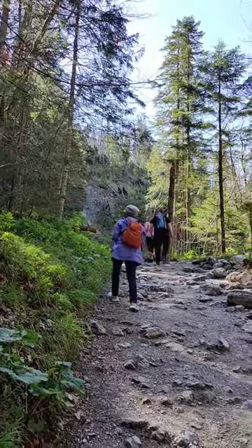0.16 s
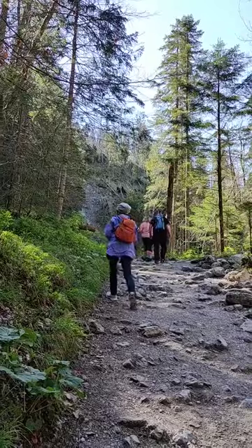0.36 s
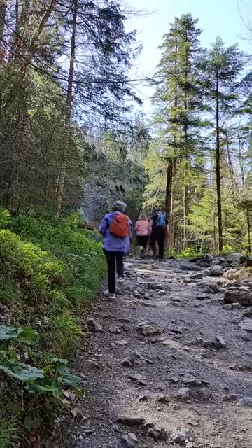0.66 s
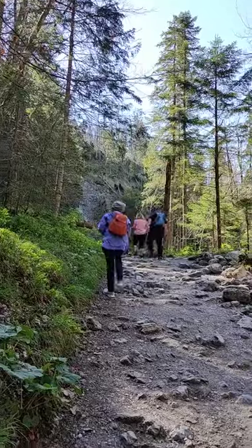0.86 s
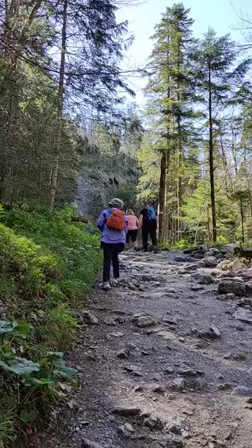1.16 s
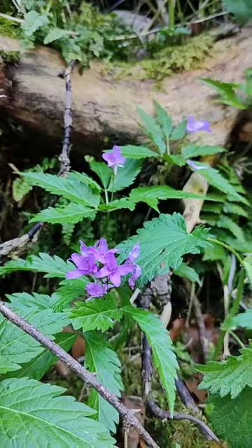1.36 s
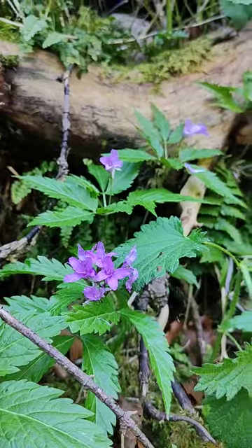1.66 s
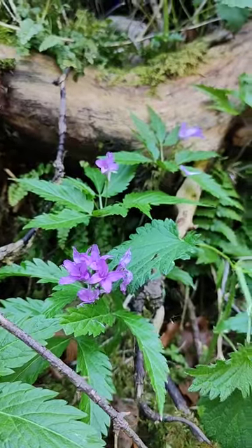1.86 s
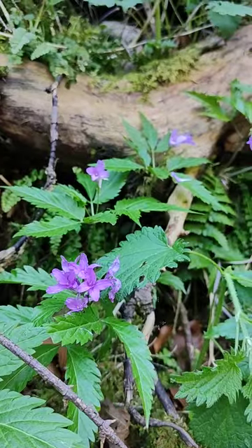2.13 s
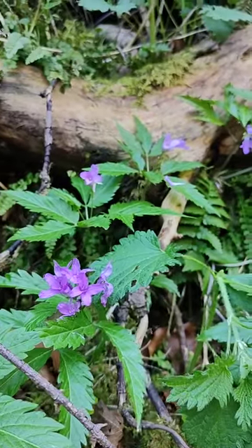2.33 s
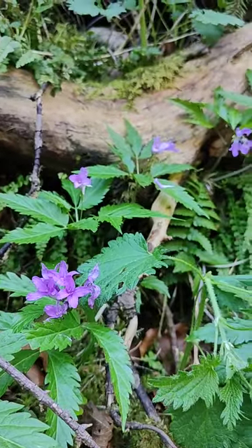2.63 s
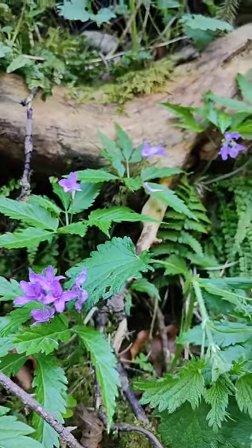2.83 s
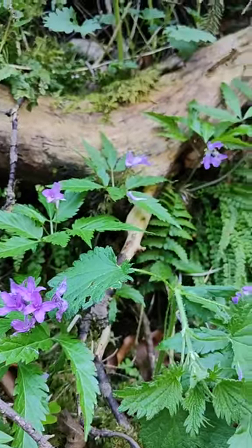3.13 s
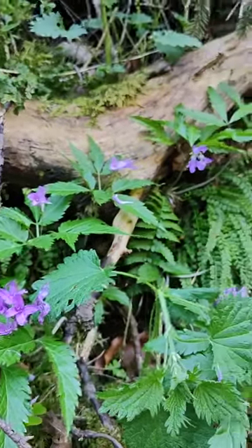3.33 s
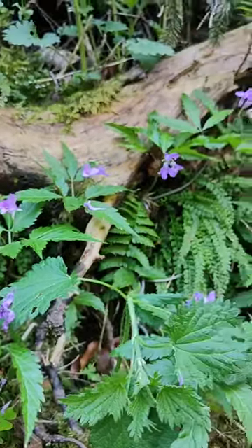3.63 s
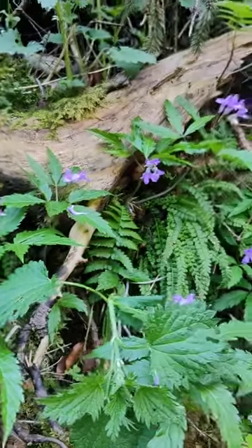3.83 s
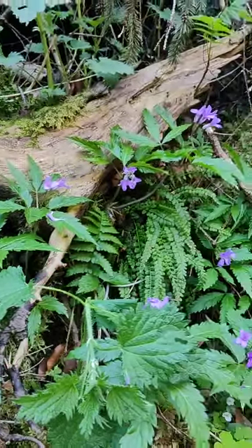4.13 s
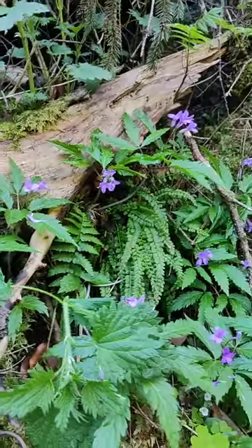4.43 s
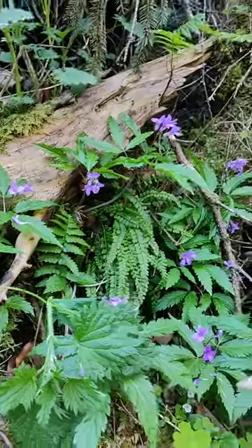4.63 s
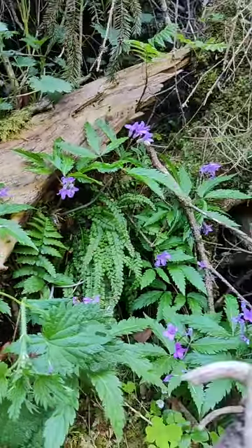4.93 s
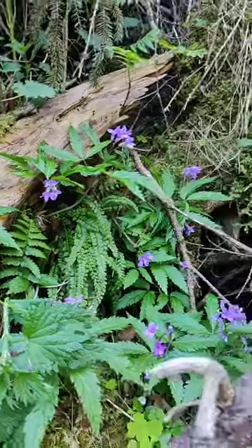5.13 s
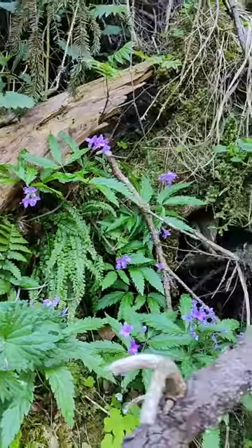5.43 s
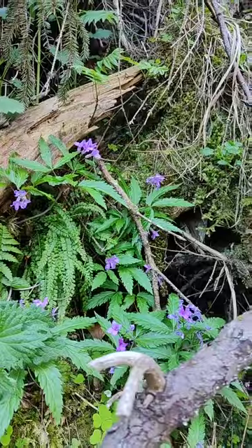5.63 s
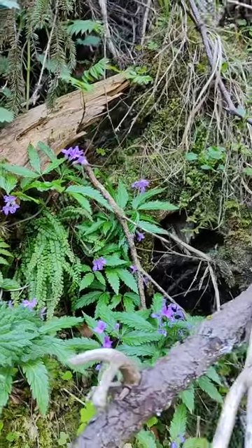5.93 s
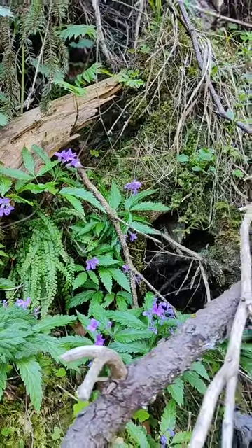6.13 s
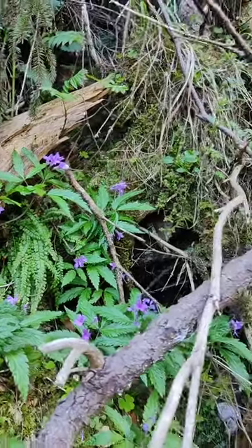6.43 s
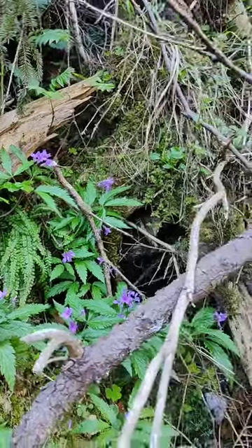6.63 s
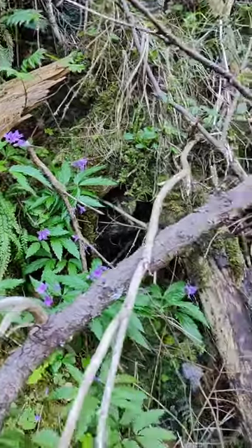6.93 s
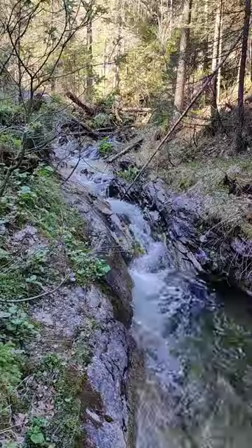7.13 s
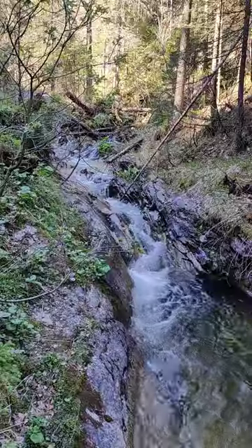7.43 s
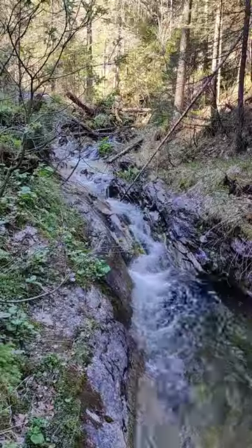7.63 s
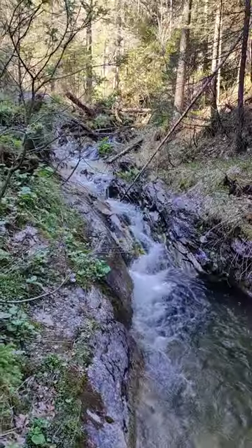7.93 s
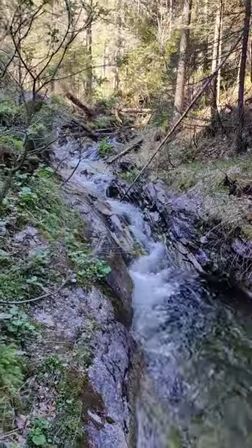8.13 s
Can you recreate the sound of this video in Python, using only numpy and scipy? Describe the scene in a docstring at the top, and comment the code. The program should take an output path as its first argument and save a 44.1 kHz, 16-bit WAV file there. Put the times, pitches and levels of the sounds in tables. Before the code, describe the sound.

Outdoors in a forest, a creek rushes evenly for about a second, cuts out briefly, then swells back as a nearer, babbling flow with hollow gurgles, a wet plop, little splashes and faint bird whistles. After another tiny gap the water returns much louder and fuller, pouring down a small cascade. Handheld stereo pickup, wide, with treble differing between sides.

```python
"""White water of a mountain creek, in three shots: from a forest path, the bank, then above a small cascade.
Shaped noise makes the rush and decaying sines the bubbles; spectral humps make a hollow between rocks gurgle.
At the bank, rising sines gulp, pulses pop, noise bursts splash and gliding sines make a faint bird call.
The first two shots stop abruptly and each following one fades in.
The two microphones differ strongly in the treble."""
import sys
import numpy as np
from scipy import signal
from scipy.fft import rfft, irfft
from scipy.io import wavfile
from scipy.ndimage import uniform_filter1d

SR = 44100
rng = np.random.default_rng(int(sys.argv[2]) if len(sys.argv) > 2 else 0)


def digitize_waveform(pressure):
    """Quantize a signal to 16-bit integers and store it at the path in sys.argv[1].

    Rows of a 2-D input are taken as channels; values are limited to [-1, 1].
    """
    field = np.atleast_2d(pressure).T
    bounded = np.clip(field, -1, 1)
    quanta = np.round(bounded * 32767).astype(np.int16)
    wavfile.write(sys.argv[1], SR, quanta)


N = 365148
TIME, BINS = np.arange(N) / SR, np.fft.rfftfreq(N, 1 / SR)  # s, Hz
PORT_DELAY_S = 0.00026  # travel time of sound from one microphone to the other

# The shots. Each row: start in seconds, end in seconds, fade-in in seconds.
SHOT_TIMES = [(-0.3, 1.2025, .1), (1.25, 7.1175, .26), (7.158, 8.4, .23)]
# Spectrum of the water at the bank. Each row: frequency in Hz, density in dB per Hz.
BANK_SPECTRUM = [(20, -99), (60, -75), (80, -69), (105, -73), (170, -67), (235, -78), (300, -64.5),
                 (385, -67), (510, -76.5), (720, -74.5), (950, -69), (1600, -68), (2200, -70), (3000, -77),
                 (10500, -96), (16000, -95)]


def gain_of(db):
    """Level law: an amplitude ratio is ten to the power of decibels over twenty."""
    return 10 ** (np.asarray(db) / 20)


def evened(x):
    """Power normalisation: the mean square becomes 1."""
    return x / np.sqrt(np.mean(x ** 2) + 1e-20)


def read(points, hz):
    """Spectral envelope: (Hz, value) points joined by lines on a log-frequency axis."""
    f, value = np.transpose(points)
    return np.interp(np.log(hz + 1), np.log(f + 1), value)


def hump(hz, centre_hz, octaves):
    """Resonance shape: a Gaussian bell on the log-frequency axis."""
    distance = np.log2((hz + 1) / centre_hz) / octaves
    return np.exp(-.5 * distance ** 2)


def swing(rows, t, axis=1):
    """Slow modulation: one column of a level curve, in dB about its median."""
    rows = np.asarray(rows)
    return np.interp(t, rows[:, 0], rows[:, axis] - np.median(rows[:, axis]))


def drift(shape, size):
    """Random modulation: noise smoothed over (bins, frames) to rms 1."""
    across_bins = uniform_filter1d(rng.standard_normal(shape), size[0], axis=0)
    return evened(uniform_filter1d(across_bins, size[1], axis=1))


def shot(start, end, fade):
    """Amplitude envelope: a swell from a tenth to full level, then a sharp drop and exponential decay."""
    rise = (.1 + .9 * np.clip((TIME - start) / fade, 0, 1) ** 1.25) * (TIME > start)
    tail = gain_of(-19) * np.exp(-np.maximum(TIME - end, 0) / 0.0047)
    return rise * np.where(TIME < end, 1, tail)


def rush(direct):
    """Diffuse-field coherence: the microphones agree in the bass, higher up only for the direct share."""
    a, b = rfft(rng.standard_normal((2, N)))
    ahead = direct / (1 + (BINS / 3500) ** 2)
    diffuse = np.sinc(2 * BINS * PORT_DELAY_S)
    same = np.clip(0.94 * (ahead + (1 - ahead) * diffuse), -1, 1)
    same = same * (1 - 0.12 / (1 + (BINS / 55) ** 4))  # air stirs the deepest bass at each microphone separately
    other = same * a + np.sqrt(1 - same ** 2) * b
    return evened(irfft(np.array([a, other]), N))


def bubbles(per_s, cycles, spread_db, count=48):
    """Bubble resonance: damped sines rise in pitch; small ones are more frequent, each from its own side."""
    out = np.zeros((2, N + SR))
    for hz in np.geomspace(280, 13000, count):
        life = cycles / hz  # decay time in s
        t = np.arange(int(min(5 * life, .2) * SR)) / SR
        number = int(per_s * np.sqrt(hz / 1000) * N / SR / count) + 1
        when, loud, side, detune = rng.random((number, 4)).T[:, :, None]
        size = evened(gain_of(spread_db * np.minimum(-np.log(1 - loud), 4)))
        turns = hz * 2 ** ((detune - .5) / 6) * t * (1 + .02 * t / life)
        ring = size * np.exp(-t / life) * (1 - np.exp(-2 * hz * t))
        at = ((when * N).astype(int) + np.arange(len(t))).ravel()
        for ear, lag in enumerate([0, (2 * side - 1) * PORT_DELAY_S]):
            wave = ring * np.sin(2 * np.pi * (turns - hz * lag))
            wave = wave * np.sqrt(hz / np.sum(wave ** 2))  # equal power per Hz
            out[ear] += np.bincount(at, wave.ravel(), N + SR)
    return evened(out[:, :N])


def water(colour, fizz, direct, bubble_db, patchy_db, ringing_db, surge_db, spray_db, along_bank=False):
    """Time-varying filtering: rush and bubbles take the place's spectrum, surge, and vary in patches and bands."""
    source = evened(rush(direct) + gain_of(bubble_db) * fizz)
    hz, t, z = signal.stft(source, SR, nperseg=1024, noverlap=768)
    hz = hz[:, None]
    level_db = read(colour, hz)
    level_db = level_db + patchy_db * drift(z.shape, size=(14, 8))
    level_db += ringing_db * drift(z.shape, size=(2, 24))
    level_db += surge_db * hump(hz, 1400, 2.2) * drift((1, len(t)), size=(1, 5))
    treble = hz ** 2 / (hz ** 2 + 3000 ** 2)
    level_db += spray_db * treble * drift((1, len(t)), size=(1, 9))
    if along_bank:
        level_db += bank_turn(colour, hz, t)
    shaped = signal.istft(z * gain_of(level_db), nperseg=1024, noverlap=768)[1]
    return np.sqrt(SR / 2) * shaped[:, :N]  # density per Hz to amplitude


def lean(x, *stones):
    """Interaural level difference: the nearest stones, each (centre Hz, dB to the right), babble from the right."""
    right_db = sum(db * hump(BINS, centre_hz, 0.26) for centre_hz, db in stones)
    return irfft(rfft(x) * gain_of(np.array([[-.5], [.5]]) * right_db), N)


def bank_turn(colour, hz, t):
    """Moving resonances: dB changes as the camera turns; a hollow deepens and grows while a brighter ring fades."""
    # Water on the bank. Each row: time in seconds, babble over the stones in dB, spray in dB (about the medians).
    flow_curve = [(1.65, 2, -0.5), (2.4, 1.1, -0.5), (3.0, 1, -0.3), (3.6, -0.0, -1.5), (4.2, -1, -0.8),
                  (4.8, -0.1, 0.9), (5.35, 0.7, 1.2), (5.9, -0.3, 0.3), (6.6, -1.3, 0.5), (7.0, -0.5, 2)]
    # Rumble of air on the microphones. Each row: time in seconds, level in dB (used about its median).
    rumble_curve = [(1.6, -60), (2.0, -49), (2.85, -52.9), (3.25, -50.5), (3.6, -59), (4.02, -50),
                    (4.4, -53), (4.85, -51), (6.0, -60), (6.4, -55), (6.75, -54.5), (7.05, -58)]
    start, end, _ = SHOT_TIMES[1]
    turn = np.clip((t - start) / (end - start), 0, 1) - .5
    middle_hollow_hz = 348  # pitch halfway through the turn
    hollow_hz = middle_hollow_hz * 2 ** (-0.27 * turn)  # sags by 0.27 octave
    ring_hz = 1660 * 2 ** (-.23 * turn)  # sags by 0.23 octave
    # the hollow carries the nearby spectrum with it
    moved_hz = hz * (middle_hollow_hz / hollow_hz) ** hump(hz, 290, 0.73)
    gurgle_db = 5 * turn + 2.1 * drift((1, len(t)), size=(1, 10))  # growth and flutter
    hollow = read(colour, moved_hz) - read(colour, hz) + hump(hz, hollow_hz, 0.39) * gurgle_db
    ring = hump(hz, ring_hz, 0.14) * (1.9 - 4 * turn)
    babble = hump(hz, 1320, 0.53) * swing(flow_curve, t)
    spray = hump(hz, 4400, 1.4) * swing(flow_curve, t, axis=2)
    rumble = hump(hz, 63, 0.5) * swing(rumble_curve, t)
    return hollow + ring + babble + spray + rumble


def gulps():
    """Air-pocket resonance: each sine swells within a few cycles, then dies away while its pitch creeps up."""
    # Big air pockets in the hollow. Each row: start in seconds, peak in dB before the trim, initial pitch in Hz.
    pockets = [(1.926, -33.5, 362), (2.788, -35, 327), (3.398, -31.5, 340), (4.12, -31, 307),
               (4.311, -31.5, 297), (4.558, -31.5, 297), (4.936, -36, 327), (6.333, -33, 363),
               (6.671, -28.5, 286), (6.844, -34.5, 271), (7.061, -32.5, 320)]
    trim_db, swell_s, rise_per_s = -3.5, 0.0095, 0.68  # the rise is a fraction of the pitch per second
    out = np.zeros(N)
    for (s, db, hz), phase in zip(pockets, rng.random(len(pockets))):
        near = (TIME > s) & (TIME < s + .15)
        t = TIME[near] - s
        turns = hz * t * (1 + rise_per_s * t / 2) + phase
        swell = t / swell_s * np.exp(1 - t / swell_s)
        out[near] += gain_of(db + trim_db) * swell * np.sin(2 * np.pi * turns)
    return out


def pops():
    """Pressure pulse: a cosine of few cycles under a Gaussian, alike in both ears."""
    # Dull pops. Each row: middle in seconds, peak in dB, pitch in Hz, half length in seconds (to 1/e).
    pulses = [(2.5795, -10.0, 1050, .0007), (2.5837, -21, 1350, .0007), (2.594, -12, 580, .0005),
              (2.5997, -18, 900, .0003), (2.6675, -23, 1650, .0005), (5.3161, -14.2, 1400, .0006),
              (5.7843, -17, 1500, .0005)]
    out = np.zeros(N)
    for s, db, hz, length in pulses:
        near = abs(TIME - s) < .01
        t = TIME[near] - s
        out[near] -= gain_of(db) * np.exp(-(t / length) ** 2) * np.cos(2 * np.pi * hz * t)
    return out


def burst(s, db, length, shape):
    """Filtered noise pulse: noise of spectrum shape(Hz) under a Gaussian envelope."""
    out, near = np.zeros(N), np.flatnonzero(abs(TIME - s) < .05)
    band = irfft(rfft(rng.standard_normal(8192)) * shape(np.fft.rfftfreq(8192, 1 / SR)))
    envelope = np.exp(-((TIME[near] - s) / length) ** 2)
    out[near] = gain_of(db) * evened(band)[:len(near)] * envelope
    return out


def splashes():
    """Band-limited noise: each splash sounds round its own pitch, and spits of fine spray are all treble."""
    # Splashes. Each row: middle in seconds, rms of the noise at the crest in dB, centre in Hz,
    # width in octaves, half length in seconds (to 1/e).
    splash_rows = [(2.59, -29, 1200, 0.68, 0.021), (2.597, -34, 190, 1.3, 0.0082),
                   (2.597, -39, 4300, .4, 0.0045), (3.159, -35, 1620, 0.14, 0.0063),
                   (3.594, -35.5, 1330, 0.32, 0.012), (3.69, -35.5, 1300, .7, 0.016),
                   (4.173, -46, 4000, 0.52, 0.017), (5.617, -37, 1290, 0.45, 0.013),
                   (5.919, -39, 4840, 0.38, 0.0037)]
    # Spits. Each row: middle in seconds, rms of the noise at the crest in dB, half length in seconds (to 1/e).
    spit_rows = [(2.593, -40.5, .003), (3.175, -58.5, .006), (3.395, -48, 0.0074), (3.692, -51, 0.0092),
                 (6.37, -49, .009), (6.832, -48, .004)]

    def spit_shape(f):
        """High-pass filtering: the colour of the water is kept above 4800 Hz."""
        return gain_of(read(BANK_SPECTRUM, f)) * f ** 4 / (f ** 4 + 4800 ** 4)

    wet = np.zeros(N)
    for s, db, hz, octaves, length in splash_rows:
        wet += burst(s, db, length, lambda f: hump(f, hz, octaves))
    for s, db, length in spit_rows:
        wet += burst(s, db, length, spit_shape)
    return wet


def birds(echo_share=0.39, echo_s=.025):
    """Frequency glide and scattering: short faint whistles, blurred by decaying echoes from the trunks."""
    # Bird notes. Each row: middle in seconds, peak in dB before the echo mix, pitch at the middle in Hz,
    # glide in Hz per second.
    notes = [(4.892, -49, 5100, -14000), (5.256, -47, 4300, 5994), (5.59, -48, 5150, -14000),
             (5.944, -46, 4330, 1500), (6.323, -56, 3330, 11993), (6.63, -50, 4250, 5007),
             (6.83, -40, 2810, 1800), (7.008, -43, 3540, 2503)]
    half_s = 0.027  # half length of a note, to 1/e
    out = np.zeros(N)
    for s, db, hz, glide in notes:
        near = abs(TIME - s) < .1
        t = TIME[near] - s
        whistle = np.sin(2 * np.pi * (hz + glide * t / 2) * t)
        out[near] += gain_of(db) * np.exp(-(t / half_s) ** 4) * whistle
    trunks = rng.standard_normal((2, SR // 4)) * np.exp(-TIME[:SR // 4] / echo_s)
    echo = signal.fftconvolve(out[None], trunks / np.linalg.norm(trunks[0]), axes=1)[:, :N]
    return (1 - echo_share) * out + echo_share * echo


def scene():
    """Superposition: the sources of each view add, and the three views follow one another."""
    # Spectrum of the water from the forest path. Each row: frequency in Hz, density in dB per Hz.
    path_spectrum = [(20, -94), (70, -80), (110, -84.5), (150, -66.5), (200, -67), (255, -73.5), (330, -68),
                     (500, -81), (750, -79), (1000, -72), (1200, -75), (1700, -69.5), (2300, -70.5),
                     (3000, -76.5), (4300, -83.5), (6200, -85.5), (7200, -92), (11500, -100)]
    # Spectrum of the water above the cascade. Each row: frequency in Hz, density in dB per Hz.
    cascade_spectrum = [(20, -91), (60, -77), (82, -68), (115, -72.5), (190, -59), (260, -63.5), (350, -57),
                        (480, -66.5), (700, -65), (900, -58.5), (1250, -62), (1700, -60.5), (2300, -60.5),
                        (2900, -69), (4300, -71.5), (6000, -77), (12000, -89.5), (16000, -86.5)]
    fizz = bubbles(per_s=2600, cycles=7.05, spread_db=2.0)
    path = water(path_spectrum, fizz, direct=0.26, bubble_db=-12.0, patchy_db=0.7, ringing_db=1.0,
                 surge_db=0.0, spray_db=1.0)
    bank = water(BANK_SPECTRUM, fizz, direct=.02, bubble_db=-7, patchy_db=0.7, ringing_db=0.86,
                 surge_db=0.56, spray_db=0.7, along_bank=True)
    cascade = water(cascade_spectrum, fizz, direct=0.58, bubble_db=-5.5, patchy_db=0.9, ringing_db=1.0,
                    surge_db=0.14, spray_db=0.4)
    views = (lean(path, (2460, 8.5), (900, 1.5)),
             lean(bank, (1450, 4)) + gulps() + pops() + splashes() + birds(),
             lean(cascade, (2150, 5.0), (1200, 4)))
    return sum(view * shot(*row) for view, row in zip(views, SHOT_TIMES))


def record(dry):
    """Transducer response: each microphone's colour and the bass roll-off, then a low-pass band limit."""
    # Response of the left microphone. Each row: frequency in Hz, gain in dB.
    left_response = [(1000, -0.35), (2700, -0.96), (3400, -4), (4100, -1.5), (4800, -6), (5700, -25),
                     (6050, -13), (6450, -17.2), (6800, -5), (7500, 1), (10700, 4.5), (12500, 9.5),
                     (13300, -3), (14800, -21.0)]
    # Response of the right microphone. Each row: frequency in Hz, gain in dB.
    right_response = [(1000, -0.5), (2200, -1.5), (3000, -2), (4000, -0.4), (4400, 3.5), (4850, -0.2),
                      (5250, 2.5), (5700, -1.4), (6350, 5), (7000, -5), (8800, 1.5), (10700, 6.5),
                      (13800, 20), (15200, 19.5)]
    colour = gain_of([read(left_response, BINS), read(right_response, BINS)])
    colour = colour * BINS ** 2 / np.hypot(BINS ** 2, 35 ** 2)  # roll-off below 35 Hz
    heard = irfft(rfft(dry) * colour, N)
    band_limit = signal.firwin(801, 15900, window=("kaiser", 9), fs=SR)  # cutoff in Hz
    return signal.oaconvolve(heard, band_limit[None], "same")


dry = scene()
out = record(dry)
digitize_waveform(out)
```